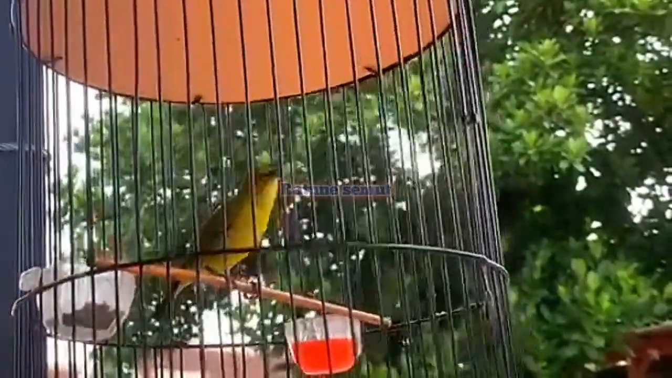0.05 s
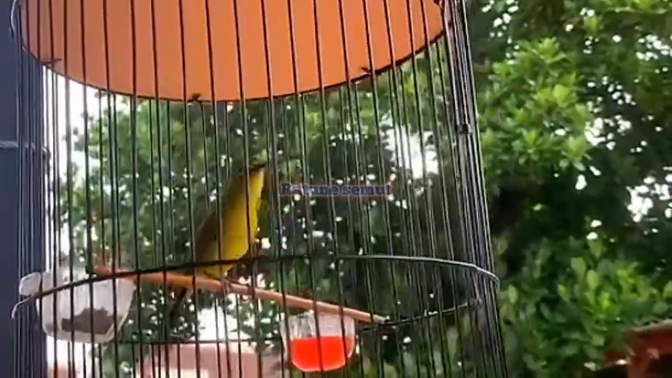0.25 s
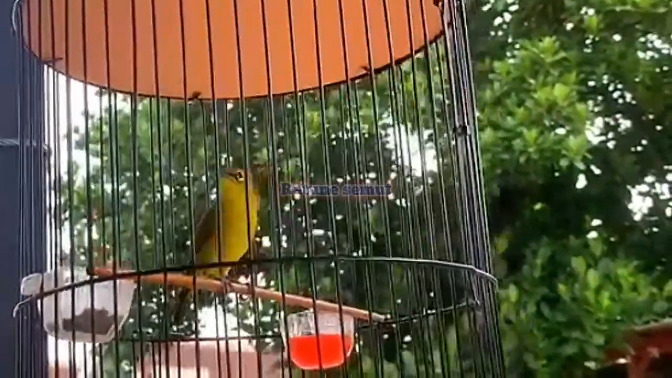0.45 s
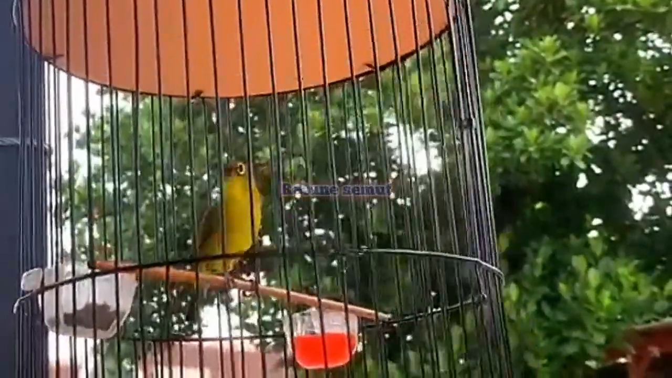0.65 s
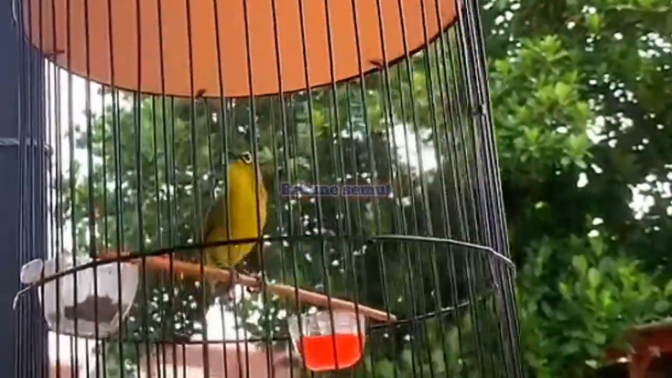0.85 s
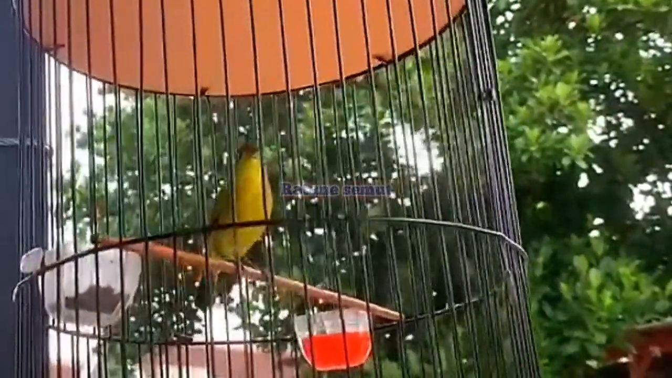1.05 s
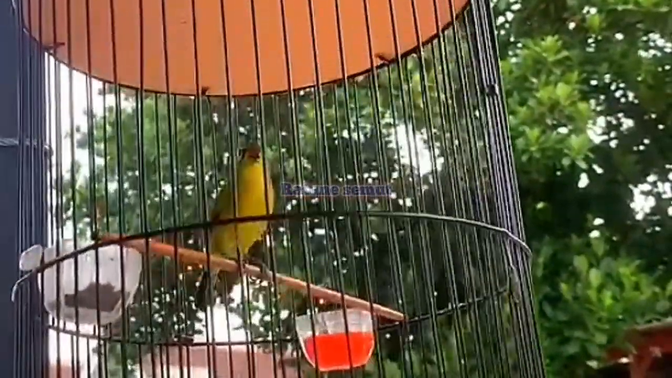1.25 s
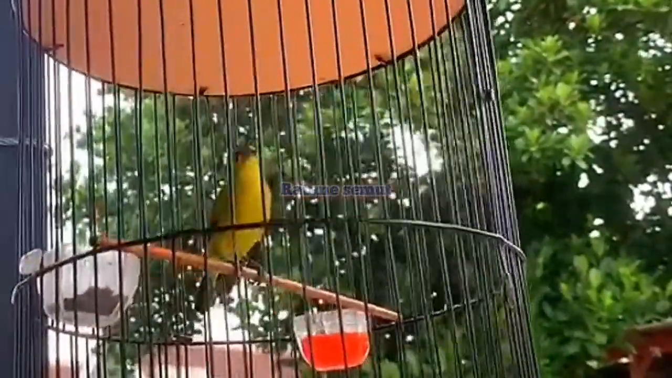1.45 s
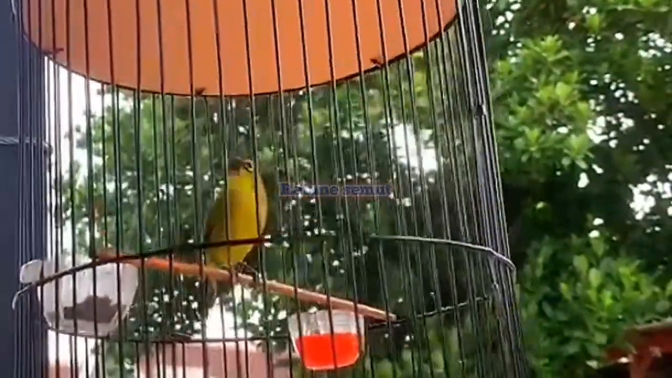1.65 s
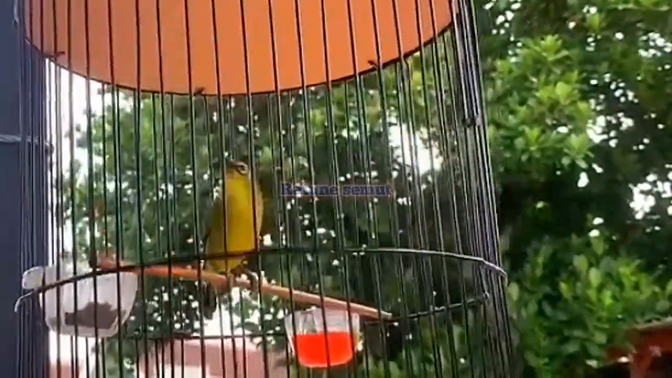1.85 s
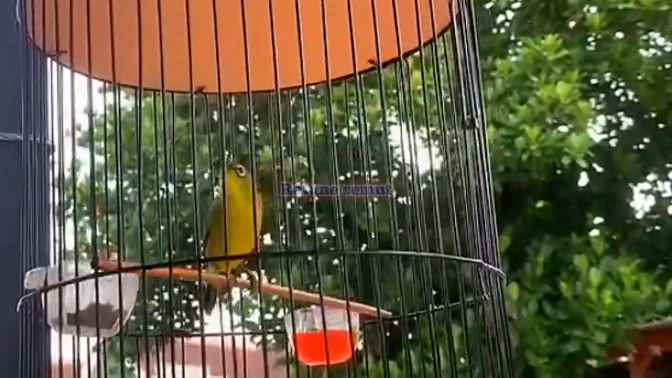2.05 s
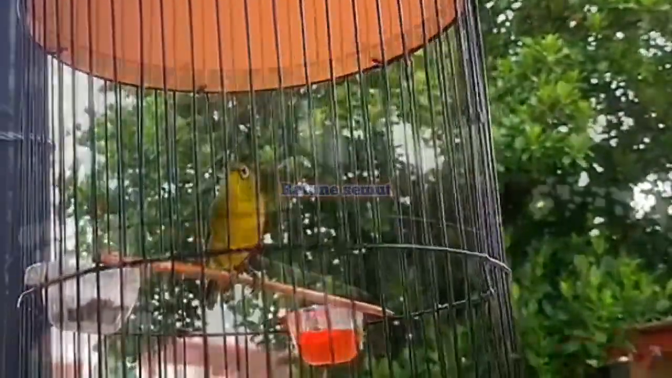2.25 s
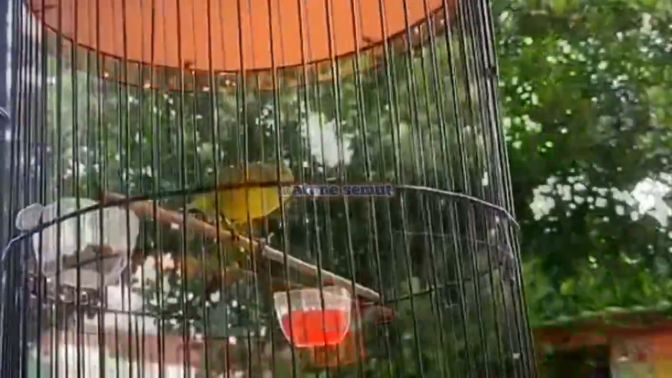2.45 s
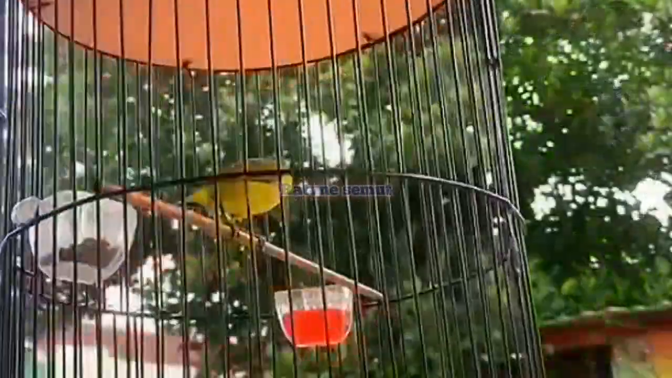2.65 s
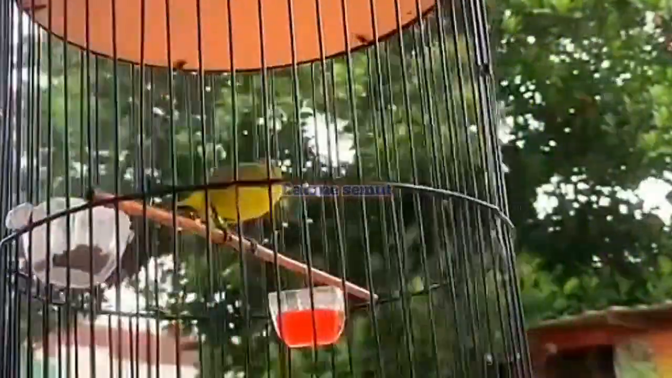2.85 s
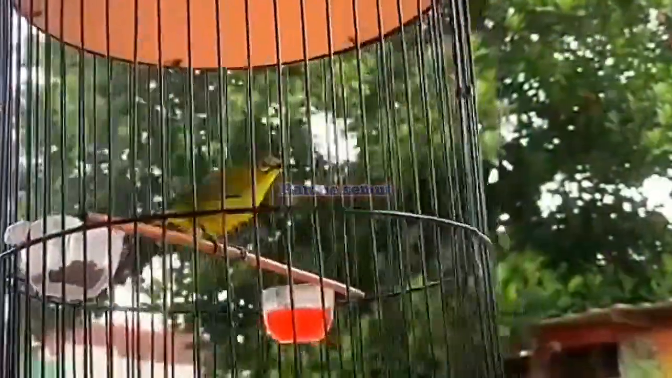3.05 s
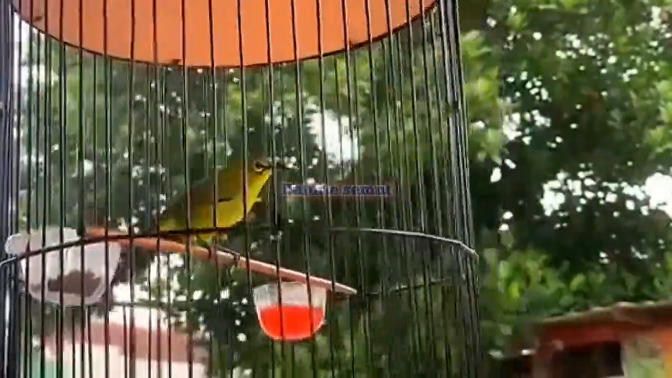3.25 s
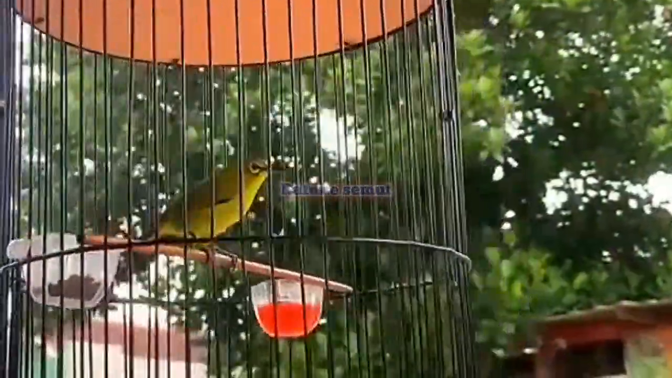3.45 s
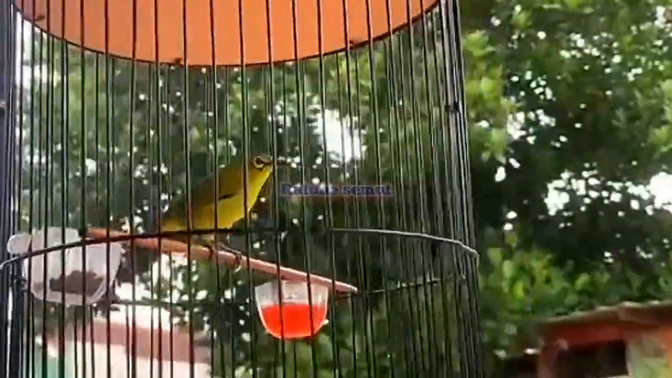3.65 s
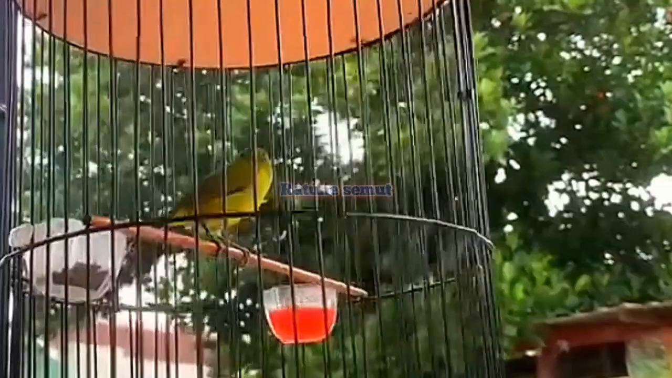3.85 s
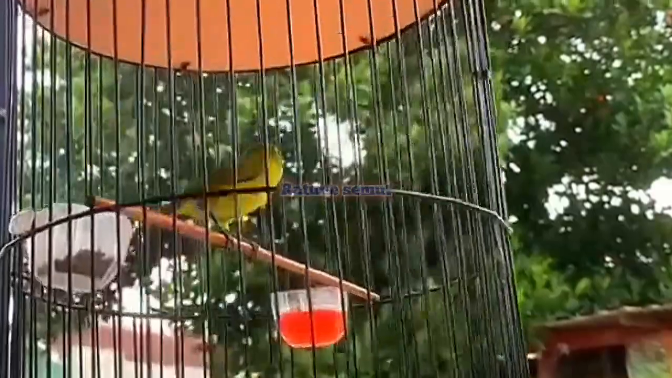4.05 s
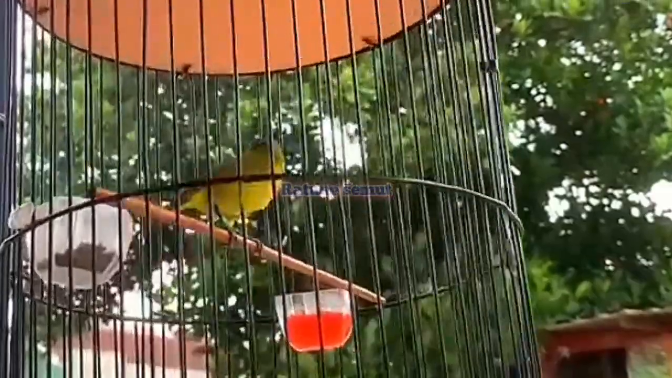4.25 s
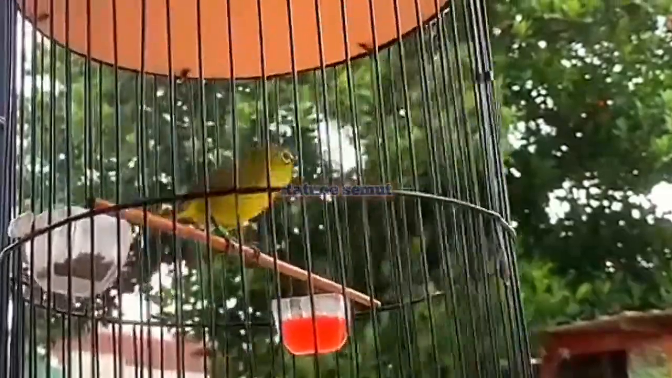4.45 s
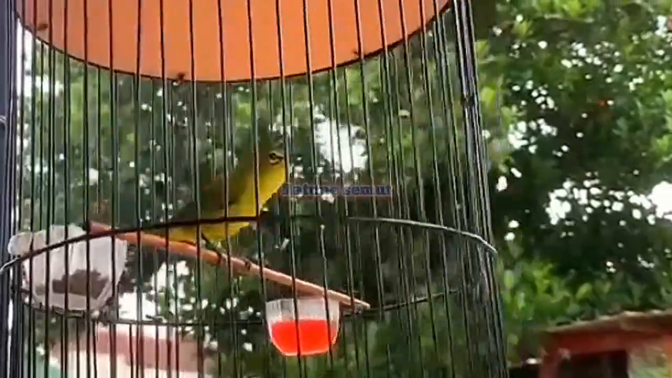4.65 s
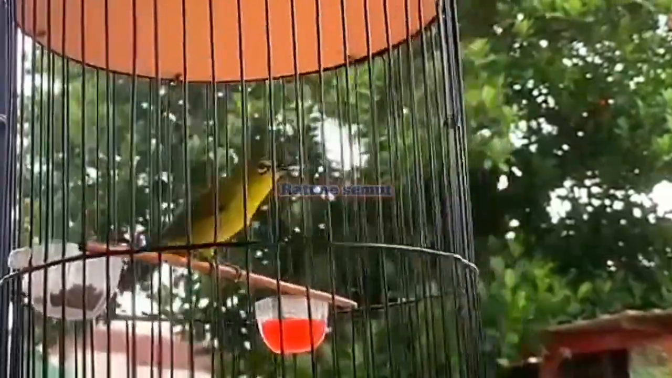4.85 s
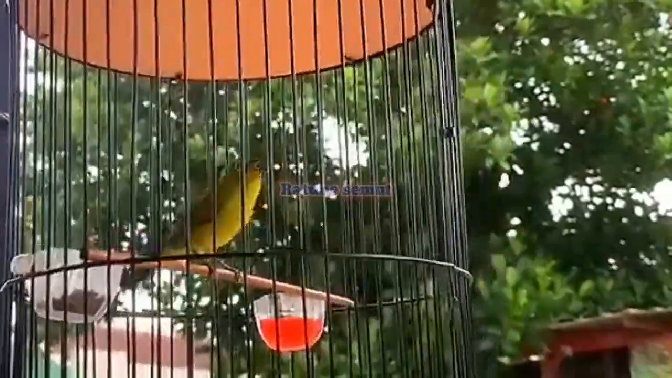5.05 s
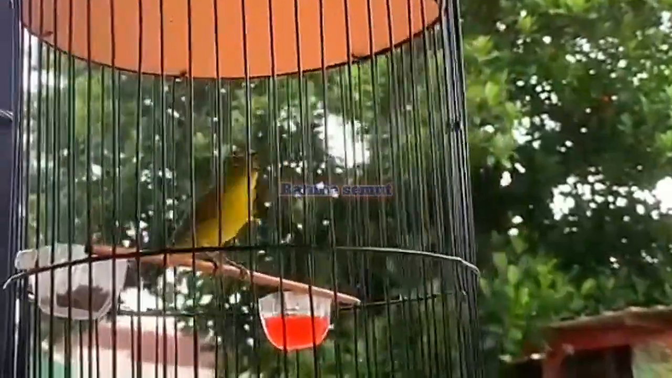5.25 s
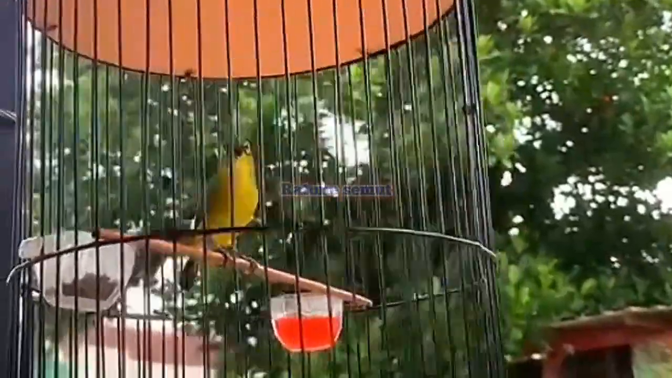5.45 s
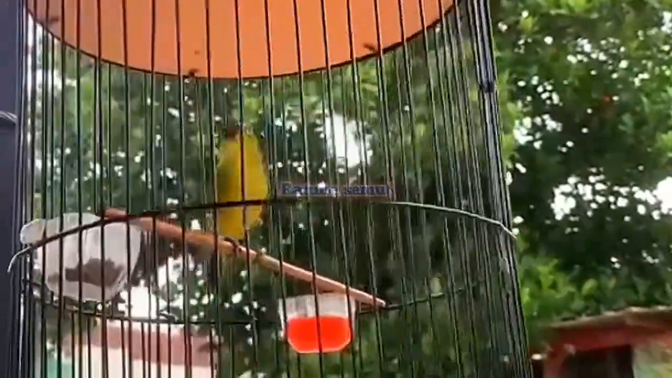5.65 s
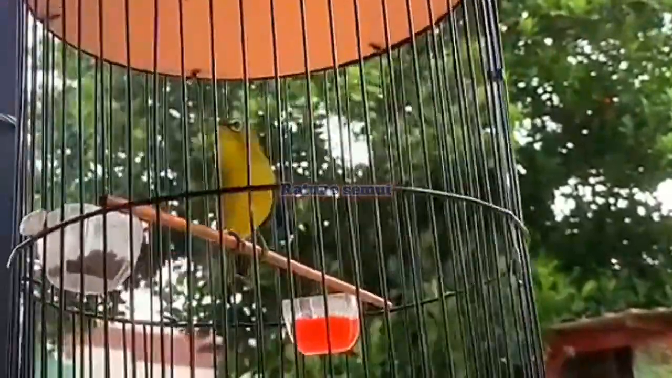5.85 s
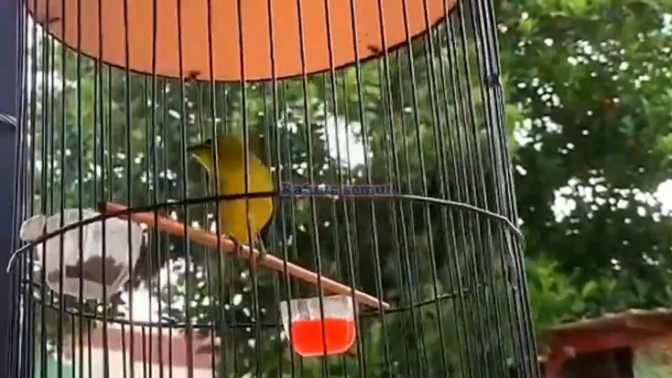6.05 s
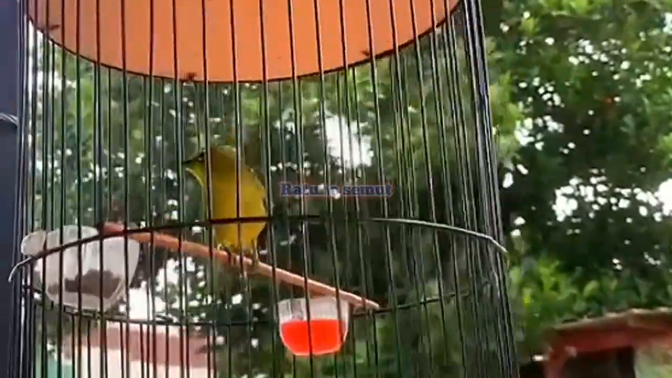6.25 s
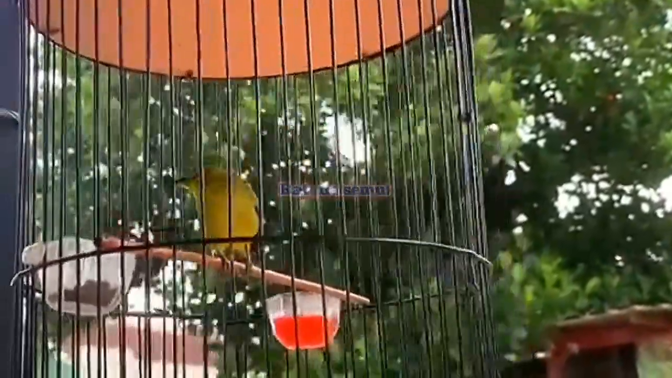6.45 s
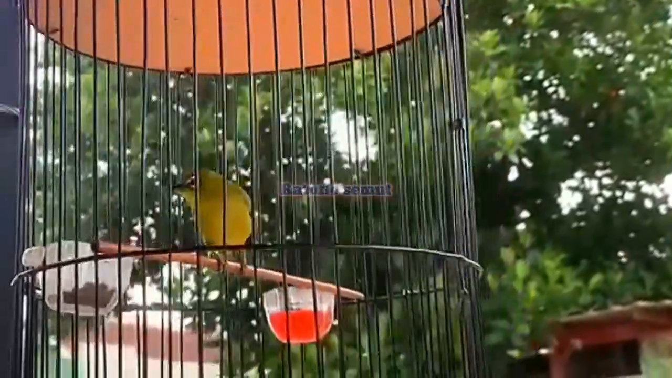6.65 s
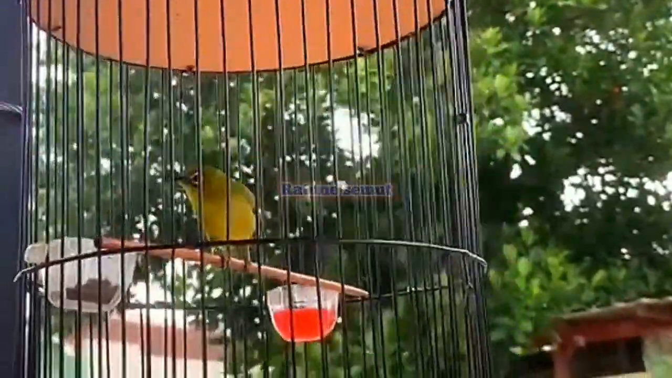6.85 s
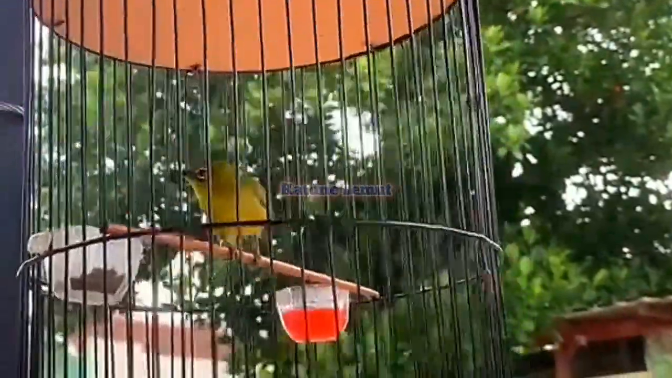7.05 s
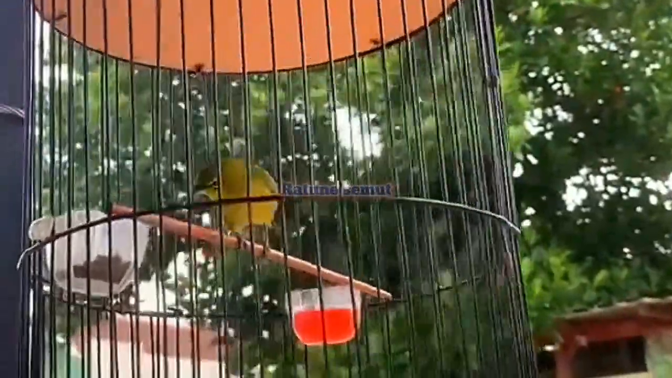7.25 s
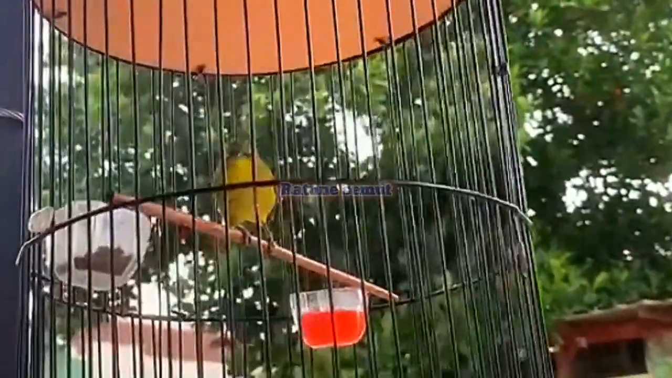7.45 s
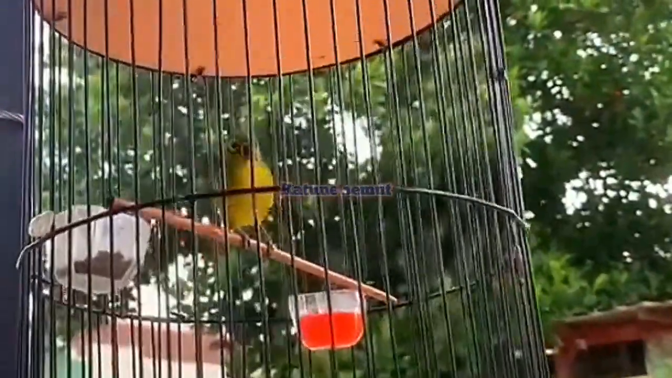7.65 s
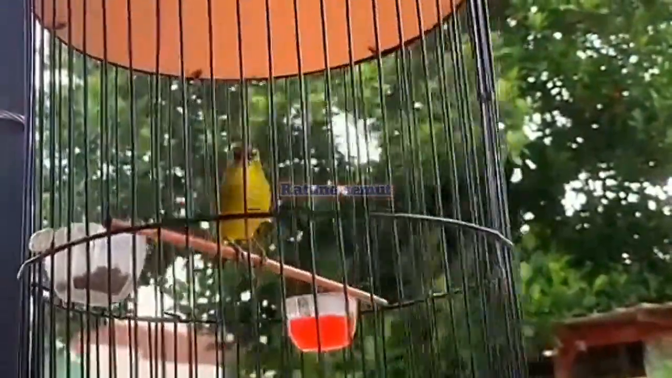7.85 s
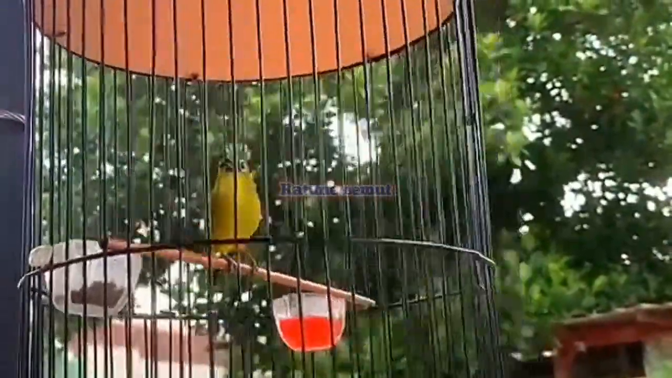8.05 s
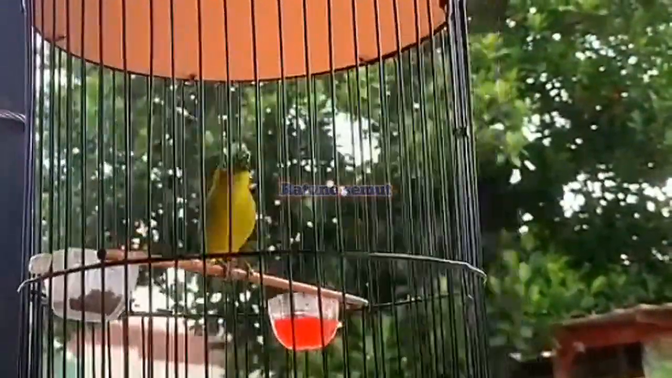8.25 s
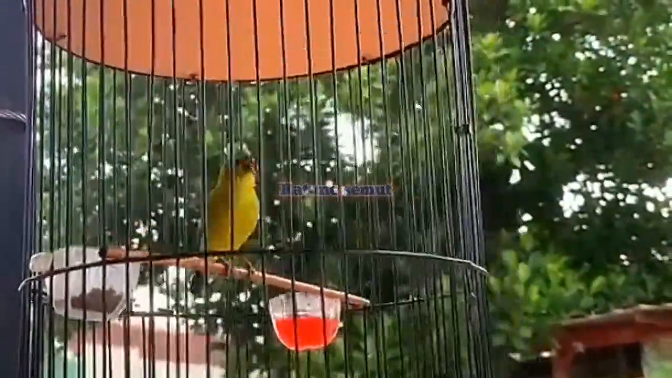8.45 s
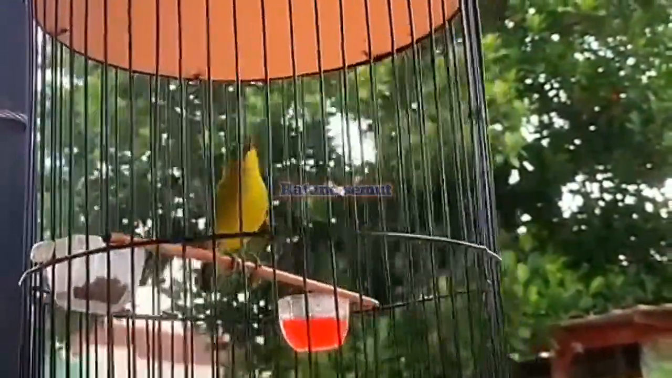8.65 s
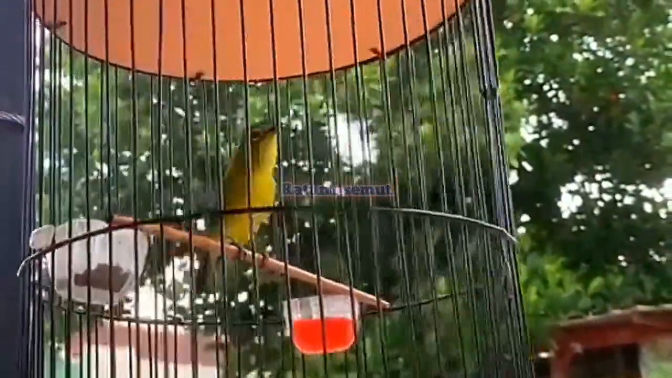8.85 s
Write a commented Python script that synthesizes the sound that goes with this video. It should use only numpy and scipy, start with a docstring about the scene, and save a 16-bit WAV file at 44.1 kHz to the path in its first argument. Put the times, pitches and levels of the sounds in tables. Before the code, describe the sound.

Three bursts of bright, piercing birdsong right by the microphone, under eaves that add quick reflections. Notes sweep steeply down or leap upward, some slightly husky. In the gaps, a distant rival's thin slurs and a lower-voiced bird's short upward chirps ring with longer echoes. Airy background noise dies away, then swells several times around the middle and late stretch.

```python
"""Under a roof, close to the microphone, a caged white-eye sings three phrases of falling and rising whistles.
Each note is a frequency-swept tone with faint partials, shaped by throat and beak; walls and eaves echo it.
A rival's slurs and a lower-voiced bird's chirps answer from farther off as gliding tones in longer echoes.
Behind them filtered noise makes an outdoor rush that fades early on and surges back a few times."""
import sys
import numpy as np
from scipy import signal
from scipy.fft import rfft, irfft, next_fast_len
from scipy.io import wavfile
from scipy.ndimage import uniform_filter1d, minimum_filter1d, map_coordinates

SR = 44100
rng = np.random.default_rng(int(sys.argv[2]) if len(sys.argv) > 2 else 0)


def master_out(mix):
    """Clip the mix to full scale and print it as 16-bit PCM to the path in sys.argv[1]."""
    frames = np.transpose(np.atleast_2d(mix))
    ceiling = np.clip(frames, -1, 1)
    pcm = np.round(ceiling * 32767).astype(np.int16)
    wavfile.write(sys.argv[1], SR, pcm)


N = 392931

# what throat and beak let through: (frequency [Hz], gain [dB])
THROAT = [(1800, -23.5), (2600, -14), (3500, 2), (4200, 12), (7000, -14), (8800, -10.5), (9900, 0.5),
          (11000, -10), (15000, 1)]
HOOK_HZ, HOOK_S = 260, 0.0032  # slurs and warbles end in a quick downward hook: depth, time constant


def amp(db):
    """Level law: 20 dB is a factor of ten in pressure."""
    return 10 ** (np.asarray(db) / 20)


def unit(x):
    """Normalisation to an rms pressure of 1."""
    return x / np.sqrt(np.mean(x ** 2) + 1e-20)


def loudness(x):
    """Envelope detection: the running rms of a sound."""
    return np.sqrt(np.abs(uniform_filter1d(x ** 2, size=600)))


def along(points, hz):
    """Spectral interpolation of (frequency [Hz], value) points on a logarithmic axis."""
    point_hz, value = np.transpose(points)
    return np.interp(np.log(hz + 1), np.log(point_hz + 1), value)


def curve(rows):
    """Linear interpolation of (time [s], value) rows to one value per sample."""
    return np.interp(np.arange(N) / SR, *np.transpose(rows))


def wobble(rate, size):
    """Band-limited fluctuation: a smooth curve through `rate` random knots a second."""
    knots = rng.standard_normal(int(size * rate / SR) + 4)
    return map_coordinates(knots, [np.arange(size) * rate / SR])


def filtered(x, response):
    """Linear filtering: the spectrum is multiplied by a response of frequency."""
    size = next_fast_len(N + SR // 2)
    return irfft(rfft(x, size) * response(np.fft.rfftfreq(size, 1 / SR)), size)[:N]


def add(track, s, sound):
    """Superposition: mix a sound into the track at time s."""
    part = track[max(round(s * SR), 0):][:len(sound)]
    part += sound[:len(part)]


def noise(colour, patchy_db):
    """Coloured noise: white noise with patches of random gain, filtered to a spectrum at rms 1."""
    spectrum = signal.stft(rng.standard_normal(N), nperseg=512)[2]
    across_frequency = uniform_filter1d(rng.standard_normal(spectrum.shape), size=5, axis=0)
    patches = uniform_filter1d(across_frequency, size=14, axis=1)
    patchy = signal.istft(spectrum * amp(patchy_db * unit(patches)), nperseg=512)[1][:N]
    return unit(filtered(patchy, lambda hz: amp(along(colour, hz))))


def reverb(x, distance=1):
    """Diffuse reverberation: a noise tail of energy 1 in which each frequency decays at its own rate."""
    # decay under the eaves at distance 1: (frequency [Hz], time to fall 60 dB [s])
    eaves_decay = [(500, 0.48), (3500, 0.23), (4500, 0.26), (5600, 0.43), (7000, 0.2), (12000, 0.16)]
    hz, t, spectrum = signal.stft(rng.standard_normal(SR * 2 // 3), SR, nperseg=256)
    decay_s = distance * along(eaves_decay, hz)[:, None]  # far sounds linger longer
    build_up = 1 - np.exp(-t / 0.0073)
    tail = signal.istft(spectrum * amp(-60 * t / decay_s) * build_up, SR, nperseg=256)[1]
    return signal.fftconvolve(x, tail / np.linalg.norm(tail))


def outdoors(floor_db=-55, bright_db=-6, uneven_db=1):
    """Broadband noise: a quiet floor, a broad rush that dies away, and brighter surges that rise and decay."""
    # fading of the broad rush: (time [s], level [dB])
    rush_fade = [(0, -43), (1, -46), (1.8, -45), (2.65, -51), (3, -71.5), (8.9, -78.5)]
    # spectra of rush, surges and floor: (frequency [Hz], spectral gain [dB])
    rush_colour = [(25, -21), (60, -27), (170, -6), (370, 2), (560, 1.5), (770, 3.5), (950, -5.5),
                   (1300, 2.5), (1700, -4), (3000, -0.5), (5000, -16), (7500, -23), (10000, -27),
                   (12000, -50)]
    surge_colour = [(25, -20.5), (55, 2.5), (170, -3.5), (400, -3.5), (900, -15.5), (1300, -1.5), (1700, 1),
                    (2600, 0.5), (3600, 0), (6000, -8), (7500, -17), (10300, -30), (11300, -38),
                    (15500, -51.5)]
    floor_colour = [(25, -10), (55, 9), (120, -1.5), (250, -2), (550, -4), (900, -12.5), (1400, -5),
                    (1620, -1), (1900, -6), (3000, -3.5), (5500, -3.5), (8200, -14), (9500, -28.5),
                    (12000, -55)]
    # surges: (peak time [s], rise [s], fall [s], peak level of bright part [dB], of broad part [dB])
    surges = [(3.47, 0.45, 1, -40, -69), (3.708, 0.47, 0.47, -37, -59), (4.08, 0.98, 0.34, -42, -48.5),
              (4.47, .04, 0.22, -55, -47.5), (4.919, 0.087, 0.085, -49.5, -40.5),
              (7.121, 0.078, 1, -39.5, -66.5), (7.479, 0.57, 0.26, -34.5, -48)]
    depth_db = 24.5  # gained over the rise, lost over the fall
    t = np.arange(N) / SR
    broad = amp(curve(rush_fade))
    bright = amp(bright_db) * broad
    for s, rise_s, fall_s, surge_db, broad_db in surges:
        swell = amp(-depth_db * np.maximum((s - t) / rise_s, (t - s) / fall_s))
        # independent noises add by energy
        bright = np.hypot(bright, amp(surge_db) * swell)
        broad = np.hypot(broad, amp(broad_db) * swell)
    floor = amp(floor_db) * noise(floor_colour, patchy_db=1.8)
    rush = broad * noise(rush_colour, patchy_db=1.5)
    surge = bright * amp(uneven_db * wobble(25, N)) * noise(surge_colour, patchy_db=3.5)
    return floor + rush + surge


def far_bird(notes, bend, rough, direct_db, wet_db, distance):
    """Direct and reverberant fields: tones that glide fast and then level off, with strong echoes."""
    out = np.zeros(N)
    for s, length, start_hz, end_hz, db in notes:
        progress = np.linspace(0, 1, int(length * SR))
        glide = end_hz + (start_hz - end_hz) * (1 - progress) ** bend
        pitch = glide * (1 + rough * wobble(200, len(progress)))
        swell = np.sqrt(np.abs(np.sin(np.pi * progress))) * amp(3.5 * wobble(90, len(progress)))
        tone = amp(db) * unit(swell * np.sin(2 * np.pi * np.cumsum(pitch) / SR))
        add(out, s, amp(direct_db) * tone)
        add(out, s, amp(wet_db) * reverb(tone, distance))
    return out


def distant_rival():
    """Frequency glides: a distant rival's slurs, in a lengthened reverberation."""
    # slurs: (time [s], length [s], start pitch [Hz], end pitch [Hz], relative level [dB])
    rival_slurs = [(2.33, 0.084, 6200, 5380, -51), (2.48, 0.13, 6620, 5360, -48),
                   (2.915, .076, 7330, 5110, -44), (3.1, 0.11, 6600, 5670, -40),
                   (3.23, 0.062, 5640, 5130, -42), (3.26, 0.24, 3830, 6420, -44),
                   (3.39, 0.079, 6570, 4960, -44.5), (3.48, .07, 6200, 5420, -38),
                   (3.55, .06, 6350, 5070, -44.5), (3.63, 0.047, 4670, 5270, -40),
                   (3.72, .07, 7200, 5220, -40), (3.87, 0.066, 7190, 5330, -40),
                   (5.95, 0.058, 5380, 5180, -52), (6.14, 0.17, 6840, 5330, -46.5),
                   (6.38, 0.069, 6460, 5490, -43.5), (6.42, 0.072, 5530, 4300, -52),
                   (6.54, 0.068, 5580, 6160, -48.5), (7.055, 0.11, 6420, 5510, -36.5),
                   (7.235, 0.049, 6660, 5640, -39), (7.29, .09, 5500, 4220, -43),
                   (7.42, 0.096, 4620, 5790, -34)]
    return far_bird(rival_slurs, bend=1.9, rough=0.0313, direct_db=-1, wet_db=0.5, distance=1.66)


def distant_chirps():
    """Frequency glides: a lower-voiced bird's short chirps, all sliding up to one pitch."""
    # chirps: (time [s], start pitch [Hz], relative level [dB])
    chirps = [(.32, 2197, -41), (.46, 2160, -42), (2.55, 2220, -53), (2.65, 2200, -47.5), (2.75, 2145, -41),
              (2.855, 2090, -40.5), (2.965, 2003, -38.5), (3.095, 1970, -42), (3.245, 2080, -38.5),
              (8.6, 2340, -49.5), (8.74, 2220, -48)]
    length_s, top_hz = .046, 2545
    slides = [(s, length_s, start_hz, top_hz, db) for s, start_hz, db in chirps]
    return far_bird(slides, bend=1.4, rough=0.035, direct_db=2, wet_db=0.5, distance=1.5)


def throb(song, level_db=-37):
    """Amplitude modulation: faint low noise follows the envelope of the loud, high notes."""
    # spectrum of the low flutter: (frequency [Hz], spectral gain [dB])
    throb_colour = [(25, 3), (55, 2.5), (170, 0), (300, -5), (500, -18), (1000, -28.5), (3000, -69.5)]
    shrill = filtered(song, lambda hz: np.clip((hz - 4000) / 1500, 0, 1))
    return amp(level_db) * loudness(shrill) * noise(throb_colour, patchy_db=1.0)


def rasp(song, level_db=-45, uneven_db=4, dull_hz=6000):
    """Turbulence noise of the syrinx, coloured by throat and beak, comes and goes within the notes."""
    hiss = filtered(noise(THROAT, patchy_db=1), lambda hz: 1 / (1 + (hz / dull_hz) ** 4))
    return amp(level_db + uneven_db * wobble(35, N)) * loudness(song) * hiss


def creak(wet_db=-7):
    """Gated noise: short husky puffs where the voice breaks at the edge of a note, with their echo."""
    # puffs: (time [s], length [s], relative level [dB])
    husky_puffs = [(0.072, 0.03, -37), (0.197, 0.045, -40), (0.797, 0.017, -36), (1.925, 0.037, -36),
                   (7.84, .04, -41), (8.086, .014, -44.5), (8.218, 0.015, -38.5), (8.36, .016, -38.5),
                   (8.447, .03, -47)]
    # their spectrum: (frequency [Hz], spectral gain [dB])
    creak_colour = [(1200, -31), (2100, -5.5), (2700, 3.5), (3500, 0), (4500, -16.5), (8000, -45)]
    gate = np.zeros(N)
    for s, length, db in husky_puffs:
        add(gate, s, amp(db) * np.sqrt(np.abs(np.hanning(int(length * SR)))))
    puffs = gate * noise(creak_colour, patchy_db=3.5)
    return puffs + amp(wet_db) * reverb(puffs)[:N]


def clock(length, count=200):
    """Uniform sampling: evenly spaced times through a note."""
    return np.linspace(0, length, count)


def sung(s, length, pitch, db):
    """Level by pitch: (s, Hz, dB) points whose level rises and dips with pitch, with soft onset and release."""
    # level at each pitch, with peaks and dips fixed in frequency: (pitch [Hz], gain [dB])
    level_by_pitch = [(2800, -20), (3300, -18), (3720, -13), (4100, -19.5), (4450, -15.5), (5100, -18), (5500, -11),
                      (5900, -15.5), (6500, -17.5), (7400, -25), (8400, -29)]
    # catches in the voice, where the pitch jumps aside for a moment: (time [s], jump [Hz])
    catches = [(0.614, 301.5), (.99, 201), (1.677, 179.5), (4.145, -250), (4.172, 451), (4.395, -300),
               (4.513, -380), (4.675, 332.5), (4.706, -170), (7.778, -520), (7.797, 279.5), (8.654, 221),
               (8.668, -220)]
    catch_s = .009  # half the length of a catch
    wander, wander_per_s = .007, 130  # unsteady pitch: share of the pitch, random turns a second
    onset_db, onset_s, release_db, release_s = -8.5, 0.0059, -7, 0.009
    t = clock(length)
    pitch = pitch + sum(jump_hz * np.exp(-((s + t - at) / catch_s) ** 2) for at, jump_hz in catches)
    pitch = pitch * (1 + wander * wobble(wander_per_s, SR // 4)[(t * SR).astype(int)])
    ends_db = onset_db * np.exp(-t / onset_s) + release_db * np.exp((t - length) / release_s)
    return np.transpose([s + t, pitch, db + along(level_by_pitch, pitch) + ends_db])


def slur(s, length, dive_s, bend, start_hz, knee_hz, end_hz, bow_hz, db, crescendo_db):
    """Two-stage downward sweep: a dive from the top to a knee, then a bowed glide that ends in a hook."""
    t = clock(length)
    dive = np.clip(t / dive_s, 0, 1) ** bend
    glide = np.clip((t - dive_s) / (length - dive_s), 0, 1)
    bow = bow_hz * np.sin(np.pi * glide)
    pitch = start_hz + (knee_hz - start_hz) * dive + (end_hz - knee_hz) * glide + bow
    hook = HOOK_HZ * np.exp((t - length) / HOOK_S)
    return sung(s, length, pitch - hook, db + crescendo_db * (t / length - .5))


def rise(s, length, climb_s, bend, start_hz, top_hz, db):
    """Upward sweep: a bent climb to the top, then a droop for any time left."""
    droop_hz_per_s = 8000
    t = clock(length)
    pitch = top_hz + (start_hz - top_hz) * np.clip(1 - t / climb_s, 0, 1) ** bend
    return sung(s, length, pitch - droop_hz_per_s * np.maximum(t - climb_s, 0), db)


def arch(s, length, flatness, foot_hz, top_hz, db):
    """Symmetric sweep cut short: up and partly down, a short tsip, a held whistle when flat-topped, or the last
    end of a note already sounding at the start."""
    from_middle = np.abs(2 * clock(0.88) - 1)  # ends after 88 % of the arch
    return sung(s, length, top_hz + (foot_hz - top_hz) * from_middle ** flatness, db)


def warble(s, length, start_hz, end_hz, flick_s, first_hz, second_hz, db):
    """Frequency modulation: a low fall broken by two quick upward flicks, at which the voice thins."""
    gap_s, width_s, dip_db = .021, 0.0049, -17
    fall_bend = 1.5  # the fall levels off toward its end
    t = clock(length)
    first = np.exp(-((t - flick_s) / width_s) ** 2)
    second = np.exp(-((t - flick_s - gap_s) / width_s) ** 2)
    fall = end_hz + (start_hz - end_hz) * (1 - clock(0.95)) ** fall_bend
    hook = HOOK_HZ * np.exp((t - length) / HOOK_S)
    pitch = fall + first_hz * first + second_hz * second - hook
    return sung(s, length, pitch, db + dip_db * (first + second))


def repertoire():
    """Song as a sequence of frequency contours: every note, from four kinds."""
    # falling slurs; a dive bend over 1 lingers on top: (time [s], length [s], dive [s], dive bend [-],
    # start [Hz], knee [Hz], end [Hz], bow of the glide [Hz], relative level [dB], crescendo [dB])
    slurs = [(.557, 0.17, 0.033, 1.32, 8380, 5690, 4475, 167, -1.5, 0),
             (0.941, 0.17, 0.084, 1.4, 7840, 5377, 4550, -58.5, -2, 1.5),
             (1.175, 0.12, 0.037, 2.1, 7850, 5880, 4600, 604, -1.5, 0.5),
             (1.347, 0.15, 0.036, 2.06, 6764, 5340, 3990, 64.5, -0.5, 0),
             (1.591, 0.14, 0.043, 1.22, 8430, 6044, 4420, 682, -2, 2),
             (1.796, 0.15, 0.042, 2.2, 6764, 5000, 3890, 66, -2, -0.5),
             (2.011, 0.079, 0.024, .9, 8070, 5880, 3380, -120, -17, -1),
             (2.144, 0.072, 0.025, 0.82, 7674, 5890, 3120, -80, -9.5, 1.5),
             (4.124, .15, .073, 1.9, 7965, 5430, 5125, -60.5, 2.5, 2),
             (4.329, 0.1, 0.013, 0.64, 8460, 6466, 5100, 82.5, -2, -1),
             (4.926, 0.14, 0.034, 0.68, 8150, 6725, 5070, -150, -2, 0),
             (7.511, 0.16, 0.075, 3.2, 8120, 6690, 5730, -170, 4, 3.5),
             (7.734, 0.14, 0.082, 2.8, 6950, 5400, 4090, -31.5, -2.5, -8)]
    # rising notes; a bend over 1 rounds the top:
    # (time [s], length [s], climb [s], climb bend [-], start [Hz], top [Hz], relative level [dB])
    rises = [(4.489, 0.1, 0.076, .9, 3446, 6250, 0.5), (4.643, 0.094, 0.099, 1.4, 3420, 5710, 1.5),
             (5.197, 0.084, 0.057, 1.2, 3600, 5965, -2), (5.294, 0.061, 0.043, 1.6, 3610, 5590, -0.5),
             (5.383, 0.063, 0.053, 1.4, 3650, 5855, 0.5), (5.481, .069, 0.074, 2.3, 3600, 5840, 0),
             (5.591, 0.072, 0.054, 1.8, 3470, 5867, -0.5), (5.709, 0.059, 0.065, 1.3, 3657, 6500, -1.5),
             (7.95, .089, .058, 2, 4030, 5877, 0), (8.088, 0.091, 0.051, 1.7, 3980, 5833, 0.5),
             (8.227, 0.094, 0.063, 2.3, 3790, 5890, -1), (8.367, 0.084, 0.059, 2, 3786, 5704, -1),
             (8.505, 0.094, 0.055, 1.7, 3616, 5720, -3)]
    # arched notes, the first being the end of a note already under way: (time [s], length [s], flatness of top
    # [-], foot [Hz], top [Hz], relative level [dB])
    arches = [(0, .011, 2.2, 4960, 5720, 5), (0.061, 0.064, 5.6, 3390, 3737, 1),
              (0.778, 0.027, 2.7, 4020, 5064, 1.5), (0.845, .029, 1.6, 3770, 5210, 0),
              (8.642, 0.071, 12, 3510, 3767, 1)]
    # low falls with flicks: (time [s], length [s], start [Hz], end [Hz], first flick after [s],
    # first flick [Hz], second flick [Hz], relative level [dB])
    warbles = [(0.161, 0.098, 5065, 3088, 0.058, 553, 638.5, 4),
               (5.107, .053, 4515, 3235, 0.027, 1153, 2, -2.5),
               (8.744, .122, 5025, 2936, .071, 663, 377.5, 0.5)]
    kinds = [(slur, slurs), (rise, rises), (arch, arches), (warble, warbles)]
    return [shape(*row) for shape, rows in kinds for row in rows]


def whistle(note, flutter_db=2.27, edge=0.0047, sag=0.15, rasp_db=4, smear=0.21, strain=0.031, strain_hz=7400):
    """Syrinx oscillation: a nearly pure tone, its phase the integral of pitch, with faint unsteady partials."""
    # partials: (multiple of the pitch [-], level in falling notes [dB], in rising notes [dB]), before THROAT
    partials = [(.5, -34, -36), (1.5, -38.5, -44), (2, -34.5, -36), (3, -50.5, -48)]
    waver = .007  # unsteadiness as a share of the pitch, before strain
    undertone_db_per_khz, undertone_from_hz = 3.5, 5900  # the half-pitch undertone grows with strain
    s, hz, db = np.transpose(note)
    t = np.arange(s[0] - edge / 2, s[-1] + edge / 2, 1 / SR)
    pressure = np.sin(np.pi / 2 * np.clip(np.minimum(t - t[0], t[-1] - t) / edge, 0, 1))
    pitch = uniform_filter1d(np.interp(t, s, hz), size=180)
    rough = waver + strain * np.clip((pitch - strain_hz) / 1000, 0, 1)  # the highest pitches turn raspy
    pitch = pitch * (1 + rough * wobble(514.0, len(t)))
    pitch = pitch * (1 - sag * (1 - pressure))  # the pitch droops as the air starts and stops
    phase = 2 * np.pi * np.cumsum(pitch) / SR
    tone = np.sin(phase)
    for k, falling_db, rising_db in partials:
        base_db = rising_db if hz[-1] > hz[0] else falling_db
        partial_db = base_db + along(THROAT, k * pitch) + rasp_db * wobble(131, len(t))
        if k < 1:
            partial_db = partial_db + undertone_db_per_khz * np.maximum(pitch - undertone_from_hz, 0) / 1000
        partial = np.sin(k * (phase + smear * wobble(640, len(t))))
        tone += amp(partial_db) * partial * (k * pitch < SR / 2)  # silent above half the sample rate
    level = amp(np.interp(t, s, db) + flutter_db * wobble(220, len(t)))
    return np.sqrt(2) * pressure ** 2 * level * tone


def white_eye(direct_db=2.0, wet_db=-14, sway=0.038):
    """Early reflections: the bird turns its head, so every note meets the walls by slightly new paths."""
    # nearby surfaces: (mean delay [s], reflection gain [dB])
    walls = [(.0031, -3.5), (.0074, -12), (.0135, -11), (0.023, -16), (0.035, -19.5), (.052, -32.5)]
    out = np.zeros(N)
    for note in repertoire():
        s, tone = note[0][0], whistle(note)
        add(out, s, amp(direct_db) * tone)
        for delay, db in walls:
            add(out, s + delay * (1 + sway * rng.standard_normal()), amp(db) * tone)
        add(out, s, amp(wet_db) * reverb(tone))
    return out


def scene():
    """Superposition: the near bird over the distant ones and the outdoor noise."""
    song = white_eye()
    rival = distant_rival()
    chirps = distant_chirps()
    return (song + throb(song) + rasp(song) + creak() + rival + chirps + outdoors())[None]


def record(dry):
    """Peak limiting and band limiting: a fast gain holds the loudest notes, then a cut removes the top."""
    top_hz = 15800
    needed = np.minimum(1, .92 / (np.abs(dry[0]) + 1e-9))
    held = minimum_filter1d(needed, size=201)
    gain = uniform_filter1d(uniform_filter1d(held, size=101), size=101)
    return filtered(dry[0] * gain, lambda hz: hz < top_hz)[None]


dry = scene()
out = record(dry)
master_out(out)
```